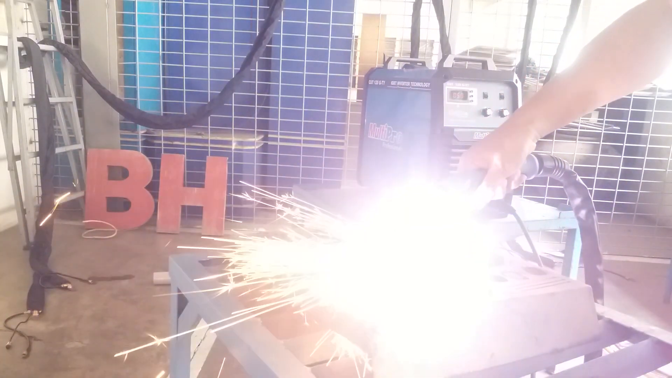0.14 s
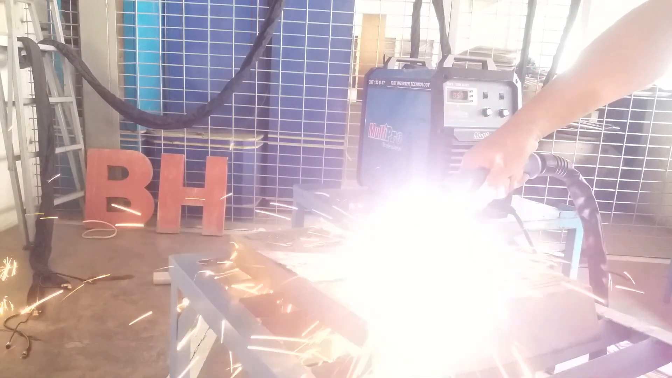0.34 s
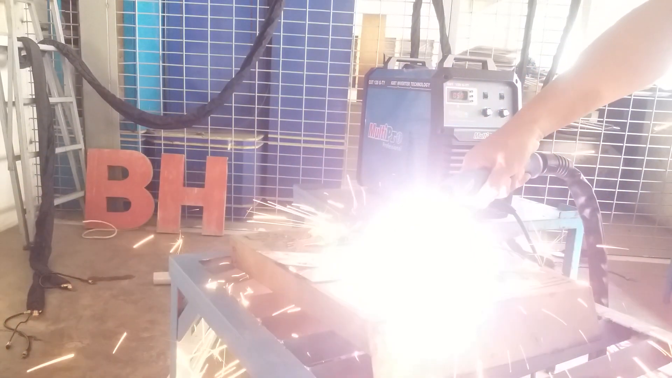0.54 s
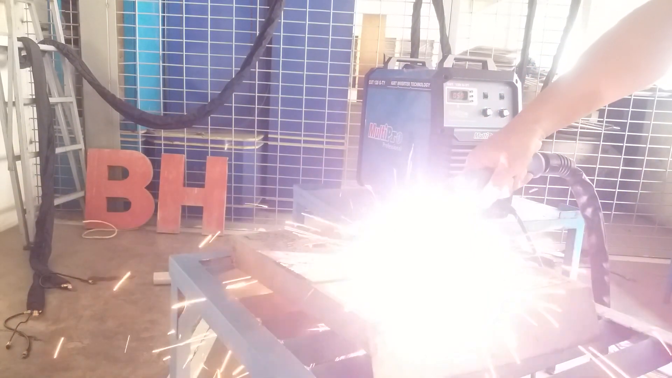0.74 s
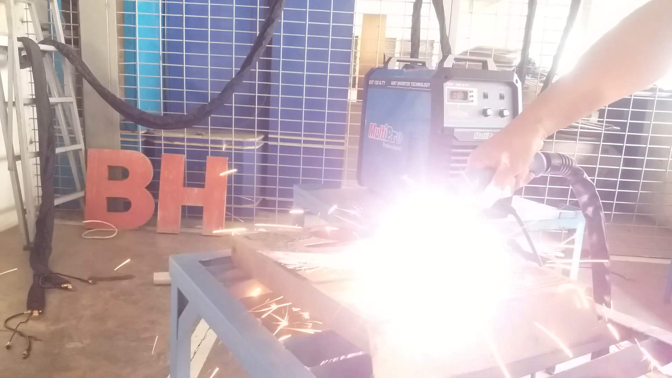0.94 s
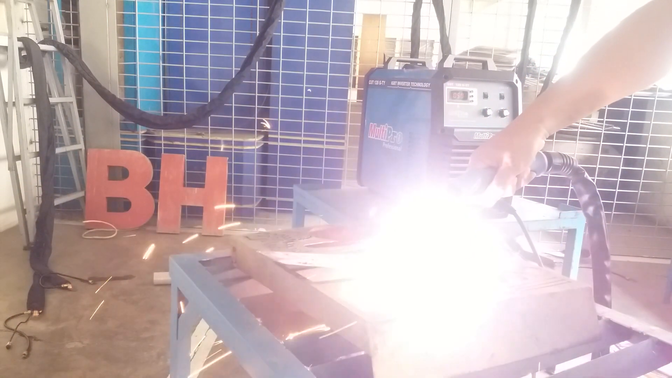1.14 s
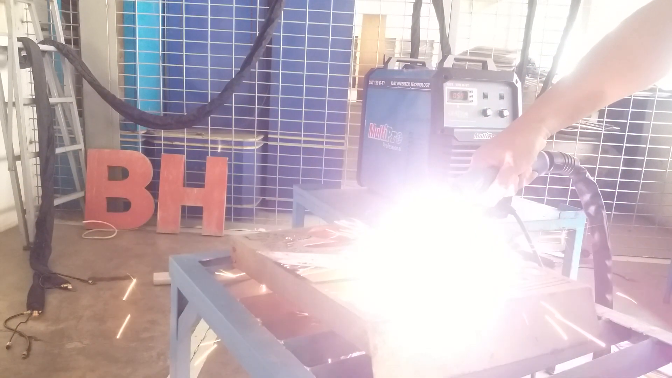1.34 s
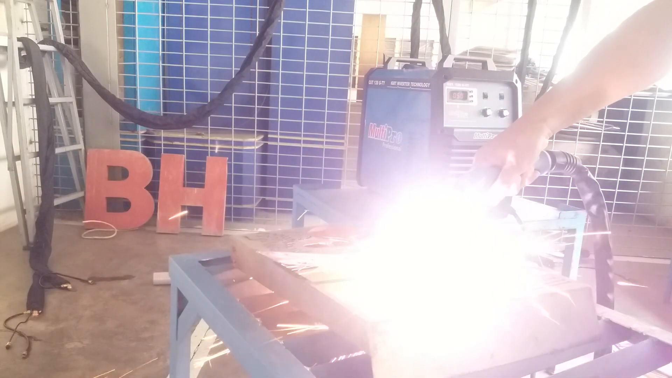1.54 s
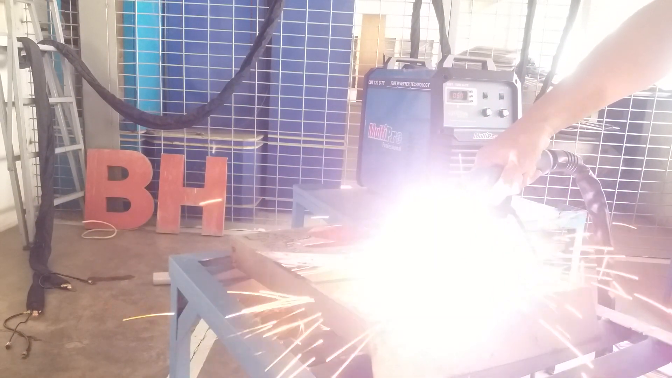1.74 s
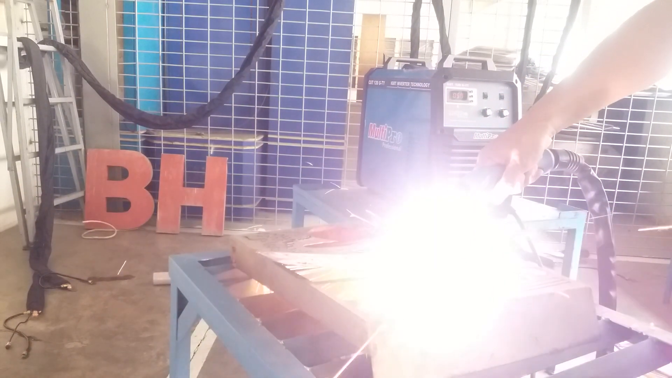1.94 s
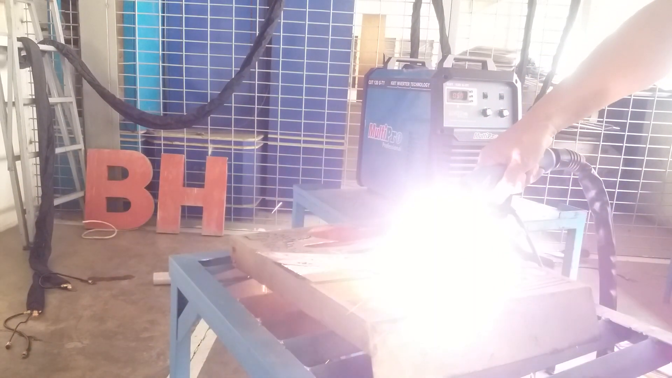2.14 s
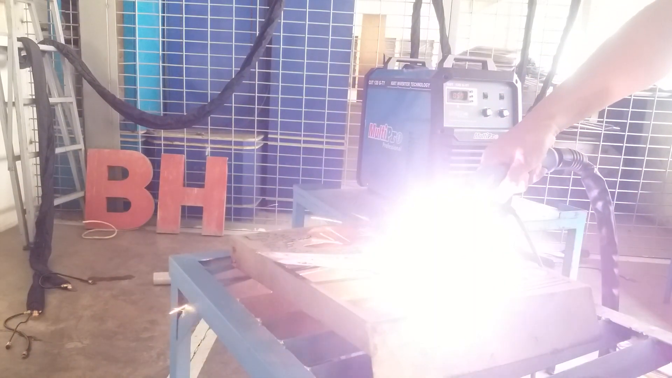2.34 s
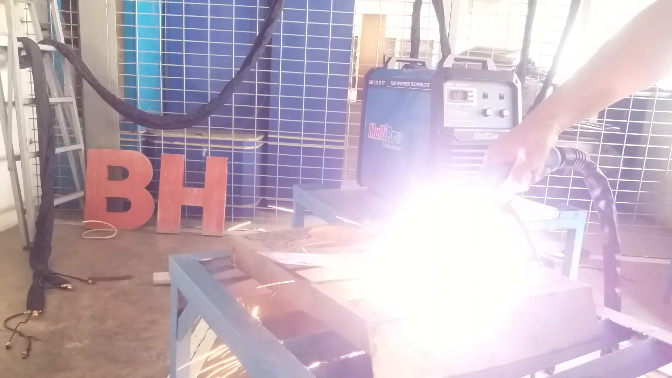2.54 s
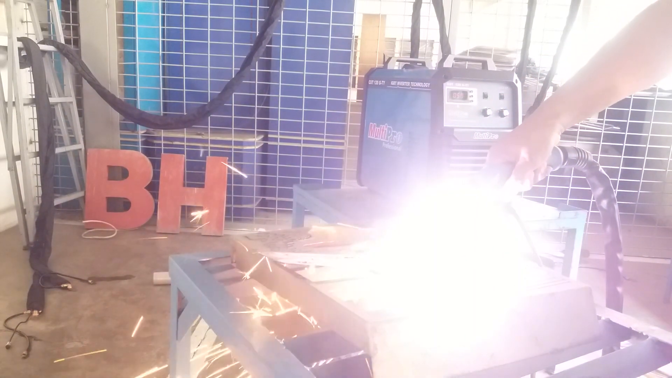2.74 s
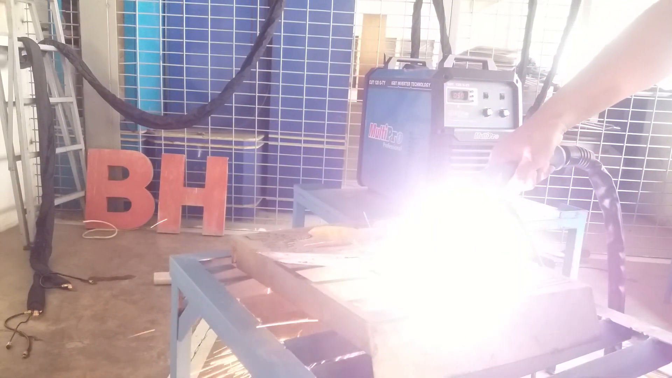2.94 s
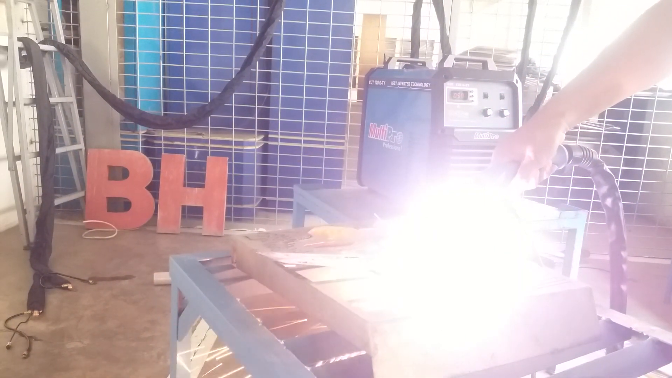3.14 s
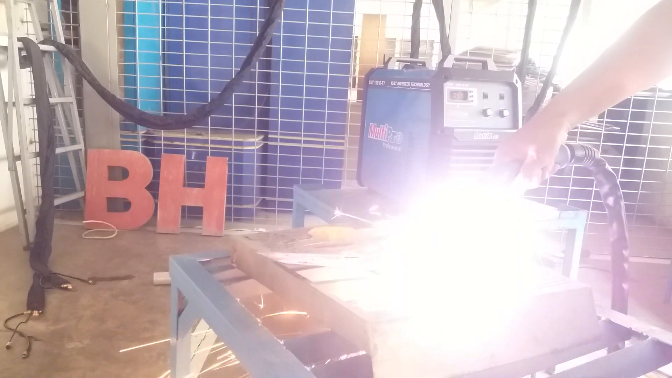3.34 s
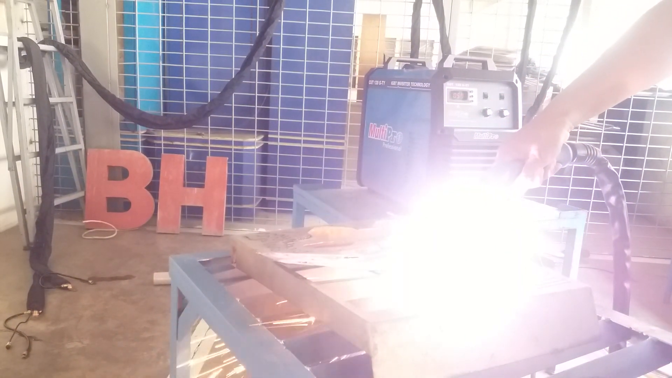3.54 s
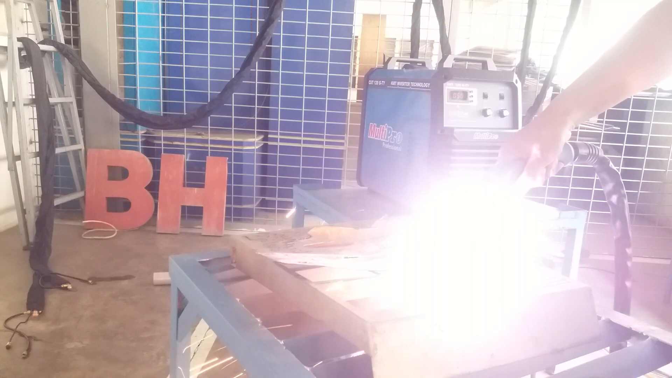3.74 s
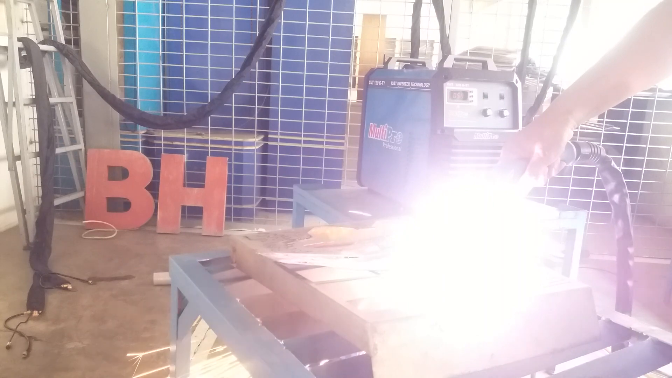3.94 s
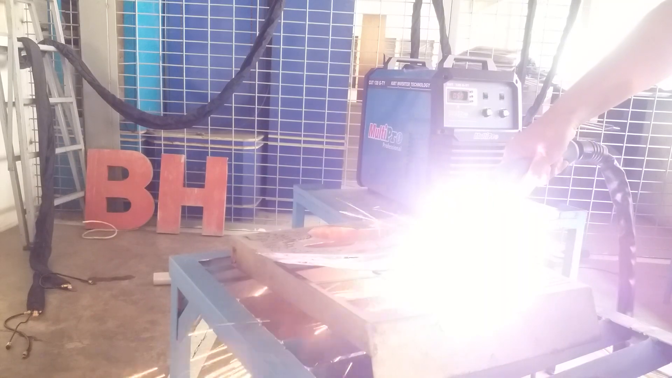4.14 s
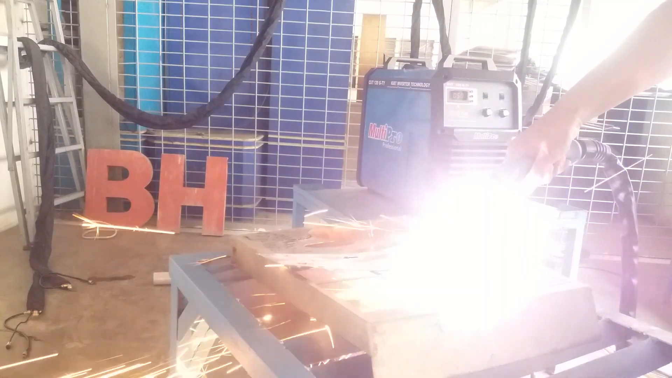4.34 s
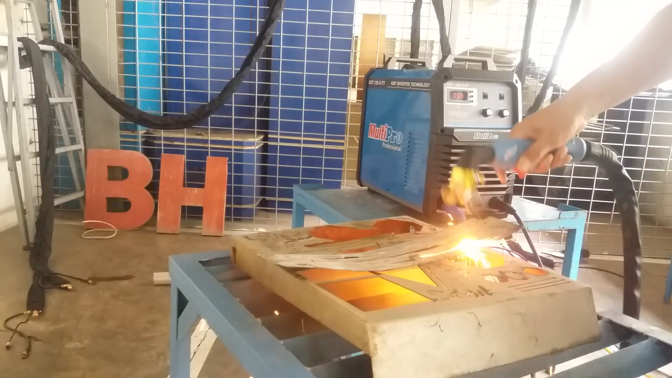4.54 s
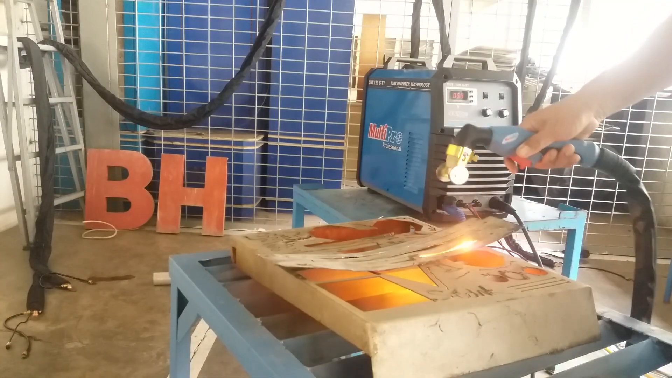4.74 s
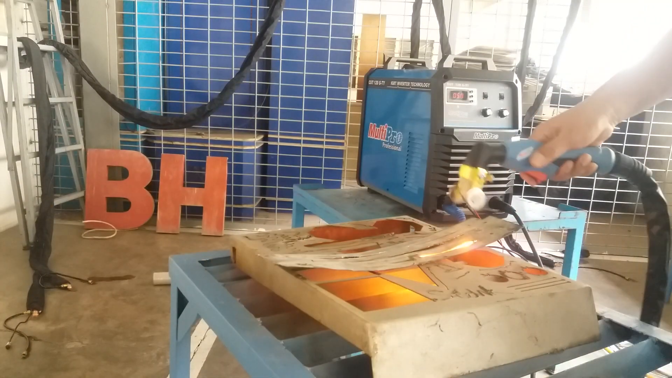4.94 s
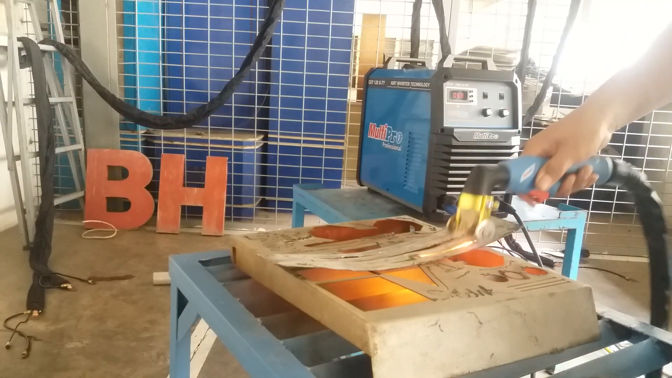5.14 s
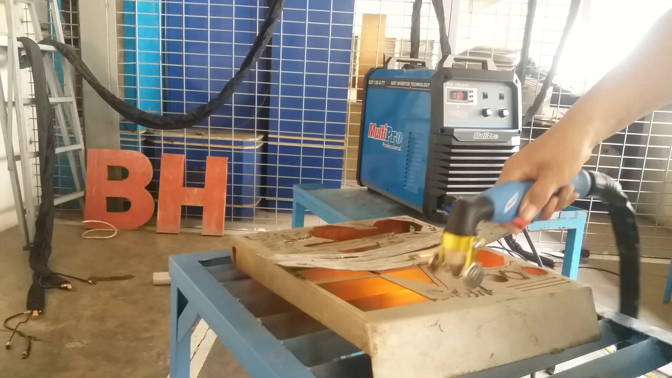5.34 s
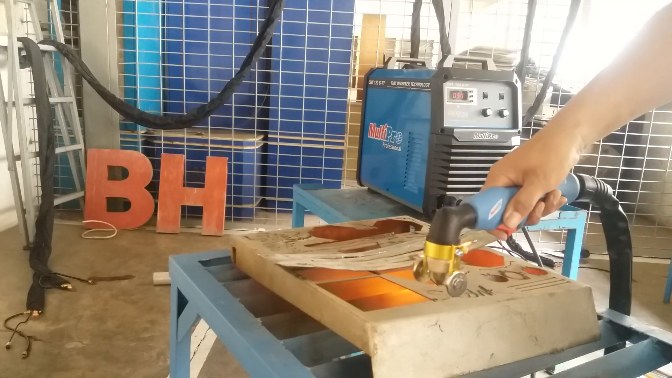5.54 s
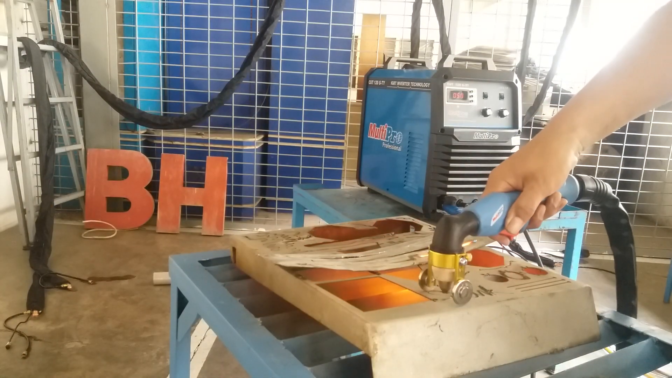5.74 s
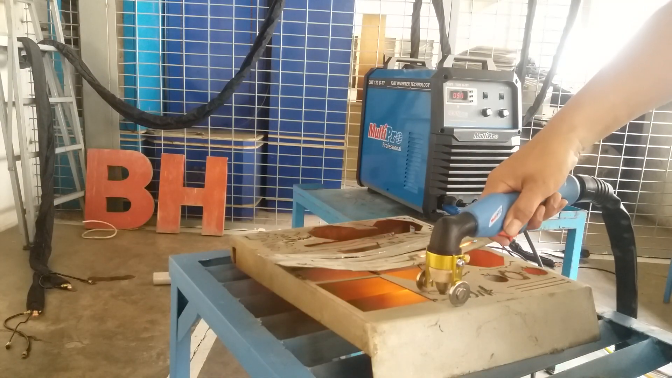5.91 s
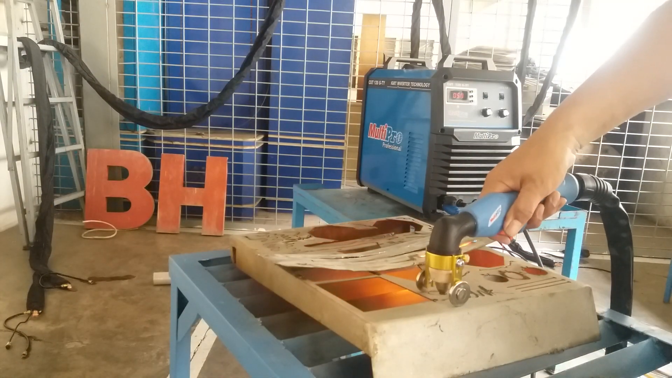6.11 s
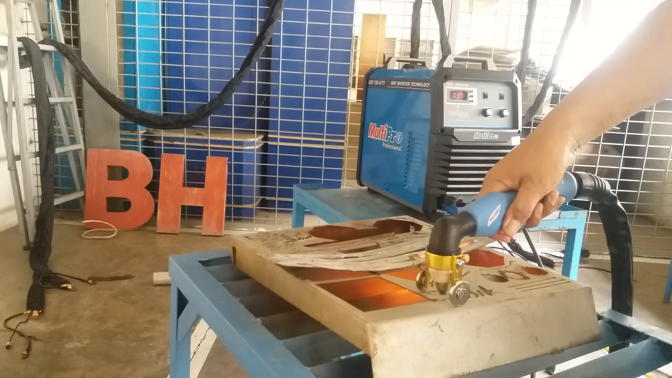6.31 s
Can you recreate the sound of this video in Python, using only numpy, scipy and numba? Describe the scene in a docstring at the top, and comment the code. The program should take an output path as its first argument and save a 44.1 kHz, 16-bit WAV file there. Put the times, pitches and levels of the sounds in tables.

```python
"""A plasma torch cuts thin steel sheet a metre from a two-port microphone in a workshop: the arc jet roars and hisses,
and its spent air buffets each port on its own. The arc breaks off, cooling air flows on and
swells into a hollow rush as the nozzle is lowered over the sheet and tray."""
import sys
import numpy as np
from scipy import signal
from scipy.fft import rfft, irfft, next_fast_len
from scipy.io import wavfile
from scipy.ndimage import uniform_filter1d, map_coordinates
from numba import njit

SR = 44100
rng = np.random.default_rng(int(sys.argv[2]) if len(sys.argv) > 2 else 0)


def unload_audio(sound):
    """Save the sound as a 16-bit wav file, at the path given as the first command line argument."""
    columns = np.transpose(np.atleast_2d(sound))
    # keep every value between -1 and 1, then stretch to whole-number steps
    steps = np.round(np.clip(columns, -1, 1) * 32767)
    wavfile.write(sys.argv[1], SR, steps.astype(np.int16))


N = 280900

# arc jet while it cuts: (s, roar dB, hiss dB, level of the dip near 8 kHz dB, hiss left minus right dB as the torch turns)
ARC = [(0.0, -19.5, -16.5, -1.5, 1), (0.29, -22.5, -16, -3, 1.5), (0.5, -24.5, -15.5, 0, 0.5), (0.65, -21.5, -16.5, 0, 0), (0.95, -23, -14.5, -3, -0.5),
       (1.24, -23, -16, -1, 0.5), (1.5, -21.5, -15.5, -2, 0), (1.75, -21, -14, -2.5, 1), (2.1, -21.5, -14.5, -1.5, 1), (2.45, -22, -16, 1, -1),
       (2.85, -21.5, -14, -3.5, 1), (3.1, -21.5, -15.5, -3, 1.5), (3.45, -22, -16.5, -0.5, 0.5), (3.78, -21.5, -15, 0, -1), (3.99, -21, -13, -3, -1),
       (4.25, -20, -13, -4, -0.5), (4.45, -22, -13.5, -1.5, 0.5)]
ROAR = [(35, -48), (60, -19), (102, -25), (342, -17.5), (760, -9), (859, -8.5), (2390, -3.5), (4240, -4), (6790, -12.5),
        (8000, -15), (10400, -37), (17600, -120)]  # (Hz, dB per Hz)
HISS = [(3500, -26), (6000, -10), (7700, -11), (10000, -4), (12000, -0.5), (14000, 0), (15600, 1)]  # (Hz, dB per Hz)
# cooling air from the nozzle: (s, hiss dB, body of the flow dB)
AIR = [(4.5, -29, -29), (4.7, -28.5, -39), (4.9, -29, -38), (5.2, -28, -36), (5.5, -27.5, -36.5), (5.6, -26, -38), (5.7, -22.5, -32),
       (5.85, -22.5, -33), (6.05, -25, -32), (6.2, -24, -35.5), (6.37, -24.5, -33.5)]
AIR_BODY = [(40, -10), (100, -13), (170, -7), (250, -11), (500, -3), (1500, -4), (3200, -3.5), (5500, -5), (7500, -8), (10000, -13)]  # (Hz, dB per Hz)
# air striking the sheet: (s, centre Hz, level dB, width octaves, hiss off the edges dB)
STRIKE = [(5.19, 960, -49, 1.5, -61), (5.215, 980, -42, 1.1, -52), (5.26, 990, -36, 2.1, -52), (5.35, 1570, -36, 1.7, -42), (5.41, 1700, -36, 2, -46),
          (5.466, 1790, -36, 2, -41), (5.52, 1900, -32, 1.5, -36), (5.575, 2010, -28.5, 1.3, -38), (5.63, 1980, -29, 1.7, -32), (5.7, 1990, -29.5, 1.8, -29.5), (5.77, 1890, -30.5, 1.9, -31.5),
          (5.85, 1760, -31, 2.2, -32), (5.974, 2080, -30, 2, -39), (6.07, 1800, -32.5, 2.4, -49), (6.158, 1690, -40.5, 1.9, -42), (6.25, 1360, -45, 1.4, -53)]
TRAY = [(117, 18, -1), (181, 32, -7), (453, 260, -8), (570, 550, -5)]  # (Hz, width Hz, dB)
# strongest puffs: (s, snap dB, port 0 left 1 right, pitch Hz, thump dB)
PUFFS = [(0.012, -23, 0, 1240, -50), (0.194, -20, 0, 750, -34), (0.212, -11.5, 0, 800, -26),
         (0.595, -15, 0, 680, -25), (0.626, -24, 0, 1150, -55), (0.783, -14, 1, 700, -31), (0.963, -14, 1, 510, -32),
         (0.985, -11, 1, 676, -26), (1.049, -13.5, 1, 730, -27), (1.069, -10.5, 1, 720, -22),
         (1.133, -10, 1, 900, -35), (1.136, -6, 1, 990, -31), (1.142, -13, 1, 470, -39), (1.171, -21, 1, 815, -37),
         (1.183, -8.5, 1, 690, -32), (1.193, -11, 1, 640, -39), (1.209, -15, 1, 810, -32),
         (1.233, -10.0, 1, 597, -37), (1.261, -7.5, 1, 696, -34), (1.274, -9.5, 1, 700, -25),
         (1.279, -16, 1, 920, -35), (1.301, -25, 0, 830, -36), (1.314, -14.5, 1, 516, -26),
         (1.42, -11, 1, 680, -26), (1.441, -7.5, 1, 760, -33), (1.455, -13, 1, 780, -20),
         (1.534, -14, 1, 750, -31), (1.54, -11, 1, 510, -31), (1.548, -18, 1, 690, -33),
         (1.561, -18, 1, 600, -35), (1.568, -18, 1, 810, -41), (1.579, -17, 1, 670, -40),
         (1.581, -11, 1, 1700, -42), (1.585, -2.5, 1, 1190, -40), (1.591, -15.5, 1, 690, -36), (1.608, -8, 1, 543, -37),
         (1.616, -11, 1, 760, -34), (1.6205, -12, 1, 590, -33), (1.634, -11, 1, 780, -31),
         (1.642, -11, 1, 590, -31), (1.664, -20, 1, 690, -27), (1.677, -9, 1, 940, -39),
         (1.754, -10, 1, 670, -26), (1.783, -14.5, 1, 670, -24), (1.811, -12, 1, 710, -24),
         (1.914, -14, 1, 810, -37), (1.92, -13, 1, 734, -33), (2.108, -14, 1, 640, -30),
         (2.139, -11.5, 1, 675, -23), (2.27, -8.5, 1, 860, -25), (2.308, -8.5, 0, 640, -33),
         (2.414, -13, 1, 920, -35), (2.468, -17, 1, 730, -28), (2.559, -17, 1, 680, -26),
         (2.568, -12, 1, 690, -23), (2.578, -11, 1, 940, -37), (2.596, -22, 0, 990, -47),
         (2.595, -16, 1, 670, -30), (2.607, -14, 1, 740, -23), (2.62, -14, 1, 680, -41),
         (2.626, -13, 1, 670, -33), (2.724, -12, 1, 690, -24), (2.758, -20, 1, 590, -28),
         (2.777, -16, 0, 590, -28), (2.78, -14, 1, 674, -31), (2.784, -11, 1, 620, -30),
         (2.789, -17, 0, 690, -29), (2.806, -15, 0, 620, -31), (2.826, -18, 0, 730, -39),
         (2.836, -14.0, 0, 790, -33), (2.846, -19, 0, 760, -27), (2.848, -13.5, 1, 720, -24),
         (2.886, -10, 0, 830, -27), (2.893, -22, 0, 810, -32), (2.914, -12, 1, 790, -25),
         (2.922, -8, 1, 725, -27), (2.926, -23, 0, 830, -33), (2.93, -13, 0, 600, -24),
         (3.043, -11, 1, 740, -22), (3.125, -12, 1, 730, -25), (3.165, -10, 1, 710, -20),
         (3.176, -12, 1, 760, -25), (3.187, -16, 1, 590, -26), (3.195, -13, 1, 610, -31),
         (3.258, -10, 1, 860, -32), (3.306, -11, 1, 660, -34), (3.332, -14, 1, 830, -28),
         (3.399, -8.5, 1, 630, -18.5), (3.719, -11.5, 1, 690, -26), (3.755, -17, 1, 670, -27),
         (3.762, -14, 1, 770, -34), (3.792, -11.5, 1, 630, -27), (3.845, -9.5, 1, 695, -25),
         (3.869, -13, 0, 700, -36), (3.892, -12, 1, 740, -30), (3.928, -11, 1, 730, -33),
         (3.947, -14, 1, 643, -21), (3.976, -10, 1, 770, -38), (4.001, -21, 1, 840, -37),
         (4.02, -12, 1, 620, -22), (4.069, -22, 0, 1060, -50), (4.072, -8, 1, 606, -26),
         (4.077, -10, 1, 690, -27), (4.1, -13, 1, 730, -20), (4.113, -13, 1, 540, -38),
         (4.117, -19, 1, 600, -38), (4.129, -14, 1, 640, -24), (4.14, -18, 0, 830, -47),
         (4.21, -12, 1, 875, -32), (4.359, -13, 1, 745, -29), (4.399, -17, 1, 800, -36), (4.428, -18, 1, 610, -29),
         (4.457, -5, 1, 900, -28), (4.46, -17, 0, 860, -34)]
PORTS = [(60, -9), (110, 1), (200, -1), (380, -2.5), (700, -2), (1290, -1.5), (2380, 2), (3300, -0.5), (4400, -4.5), (5500, -7.5),
         (6500, -1), (7800, 6), (9000, 4), (11000, 2), (15000, 1.5)]  # (Hz, left minus right dB)
TOP_HZ = 15735  # fixed
AIR_HISS = [(5000, -37), (7500, -16), (8500, -11), (10000, -4.5), (11000, -2.5), (12500, 0.5), (14000, 0.5), (15800, 2)]  # (Hz, dB per Hz)
EDGE_HZ, EDGE_WIDTH_HZ = 4250, 4900
ARC_ALIKE = [(100, 0.94), (1000, 0.44), (2500, 0.57), (5000, 0.27), (7000, 0.1), (10000, 0.11), (16000, 0.11)]  # (Hz, share common to the ports)
AIR_ALIKE = [(100, 1), (400, 0.89), (2000, 0.82), (4500, 0.4), (6800, 0.088), (9000, 0.43), (16000, 0.14)]  # (Hz, share common to the ports)
LAG_S = 7e-5  # the left port hears the torch later
# the arc breaks: the workshop rings out, the roar in the kerf lingers a moment
ARC_OFF_S, ROAR_LINGERS_S = 4.455, 0.015
ROAR_T60_S = 0.5
HISS_T60_S = 0.29

# the tray drones more and more as the nozzle settles over it
DRONE_FROM_S, DRONE_RISE_S, DRONE_DB = 5.73, 0.16, -39
# each puff ends a gust of smaller eddies on its port, and a lull follows; (left, right), the right port lies in the stream
GUST_DB, GUST_S, CALM_DB = (-23, -21.5), (0.054, 0.063), (-55, -37)
STREAM_FROM_S, STREAM_RISE_S = 0.43, 0.39  # the stream settles on the ports once the cut is under way
# bench, tray and hand mirror the torch; the paths change as it moves
ECHO_DB, ECHO_FIRST_S, ECHO_LAST_S, ECHO_DRIFT_S, ECHO_DRIFT_RATE = -20, 0.0007, 0.006, 9e-5, 2.2  # fixed
ECHO_ABOVE_HZ = 2500  # small surfaces mirror only short waves  # fixed
DIP_HZ, DIP_WIDTH_HZ = 7940, 8000
LULL_S, THUMP_HZ = 0.029, 225
SHEET = [(872, 26, -1), (1520, 110, 1.5), (1863, 44, 0.5), (2110, 230, -0.5), (2260, 110, 0.5), (2760, 140, 1), (3100, 79, 2),
         (3420, 51, 1), (4180, 63, 1.5), (4660, 120, -1)]  # the sheet rings with the jet: (Hz, width Hz, lift dB)
OVERTONE, OVERTONE_DB, OVERTONE_OCTAVES = 1.86, -12, 0.14  # second resonance of the gap, as a multiple of the first
WALLS_DB, WALLS_T60_S, WALLS_FROM_S, WALLS_BELOW_HZ = -7, 0.25, 0.008, 4000  # sound returned by the workshop, dull  # fixed
# the jet's colour wanders as the torch travels: (s, then level dB near each of the four centres below)
WANDER = [(0, 0.4, 0.23, 0.078, 0), (0.3, 1, 0, 0, 0), (0.6, 1, 0.32, 0.095, 0.08), (0.9, 0.24, 0.25, 0, 1), (1.2, 0, 0.17, 1, 0), (1.5, 0, 0, 1, 0), (1.8, 0, 0.19, 1, 0),
          (2.1, 0, 1, 0, 0), (2.4, 0.12, 0.74, 0, 0), (2.7, 0, 0.91, 0.45, 0), (3.0, 0, 0.89, 0, 0), (3.3, 0, 1, 0.089, 0), (3.6, 0, 0, 0, 0), (3.9, 0, 0, 0.23, 0), (4.2, 0, 0, 0.093, 0), (4.45, 0, 0, 0, 0)]
WANDER_HZ = [(2000, 770), (3100, 570), (5500, 1400), (15000, 2200)]  # (centre Hz, width Hz)
CORE_DB, CORE_OCTAVES = -7, 0.55  # a narrower core at the centre of the gap's peak, sharpening it



def undb(db):
    return 10 ** (np.asarray(db) / 20)


def unit(x):
    return x / np.sqrt(np.mean(x ** 2))


def along(table):
    """Columns of a time table at every sample; outside it the end values hold."""
    s, *columns = np.transpose(table)
    return [np.interp(np.arange(N) / SR, s, c) for c in columns]


def within(table, fade_s=0.14):
    """1 while a table runs, fading to 0 outside it."""
    t0, t1 = table[0][0], table[-1][0]
    return np.interp(np.arange(N) / SR, [t0 - fade_s, t0, t1, t1 + fade_s], [0, 1, 1, 0])


def across(table, hz):
    """A frequency table read on a log axis."""
    f, v = np.transpose(table)
    return np.interp(np.log(hz + 1), np.log(f), v)


def walk(rate):
    """Random levels held 1 / rate s and slewed twice; spread near 1."""
    k = int(SR / rate)
    return unit(uniform_filter1d(uniform_filter1d(np.repeat(rng.standard_normal(N // k + 1), k), k), k)[:N])


M = next_fast_len(N)
HZ = np.arange(M // 2 + 1) * SR / M


def colour(x, gain):
    return irfft(rfft(x, M) * gain, M)[..., :N]


def field(alike):
    """Spectra of white noise at the two ports: a common part that arrives with a lag, the rest diffuse."""
    c = np.clip(across(alike, HZ), 0, 1)
    right, own = rfft(rng.standard_normal((2, M)))
    return np.array([c * right * np.exp(-2j * np.pi * HZ * LAG_S) + np.sqrt(1 - c ** 2) * own, right])


def rush(spectrum, alike, shared_db, own_db, rate, drift_db=0., count=1):
    """Turbulent noise in count bands an octave: they surge together, flicker alone and drift slowly apart."""
    gain, surge, out = undb(across(spectrum, HZ)), walk(rate), 0
    bins, low = field(alike) * gain, np.log2(spectrum[0][0] / 62.5)  # fixed
    for hz in 62.5 * 2. ** (np.arange(max(int(low * count), 0), 8 * count + 1) / count):  # fixed
        share = np.cos(np.pi / 2 * np.clip(count * np.log2((HZ + 1) / hz), -1, 1)) ** 2
        out = out + irfft(bins * share, M)[:, :N] * undb(shared_db * surge + own_db * walk(rate) + drift_db * walk(4))  # fixed
    return unit(out)


@njit
def sweep(x, hz, damping):
    """State-variable band-pass with a moving centre."""
    y, b, l = np.empty(len(x)), 0., 0.
    for i in range(len(x)):
        g, k = np.tan(np.pi * hz[i] / SR), damping[i]
        v = (b + g * (x[i] - l)) / (1 + g * (g + k))
        b, l, y[i] = 2 * v - b, l + 2 * g * v, np.sqrt(k) * v
    return y


def arc():
    """The constricted jet roars in the kerf and hisses at the nozzle."""
    roar_db, hiss_db, dip_db, turn_db = along(ARC)
    after = np.arange(N) / SR - ARC_OFF_S
    roar_db = roar_db - 60 * np.maximum(after - ROAR_LINGERS_S, 0) / ROAR_T60_S  # fixed
    hiss_db = hiss_db - 60 * np.maximum(after, 0) / HISS_T60_S  # fixed
    roar = rush(ROAR, ARC_ALIKE, shared_db=.45, own_db=.35, rate=20, drift_db=.4, count=2)  # fixed
    hiss = rush(HISS, ARC_ALIKE, shared_db=.5, own_db=.8, rate=13, drift_db=.9, count=6)  # fixed
    jet = undb(roar_db) * roar + undb(hiss_db + np.array([turn_db, -turn_db]) / 2) * hiss
    for (hz, width), db in zip(WANDER_HZ, along(WANDER)):
        jet = jet + (undb(db) - 1) * colour(jet, resonance(hz, width))
    return jet + (undb(dip_db) - 1) * colour(jet, resonance(DIP_HZ, DIP_WIDTH_HZ))


def air():
    """Cooling air flowing free of the nozzle."""
    hiss_db, body_db = along(AIR)
    hiss = rush(AIR_HISS, AIR_ALIKE, shared_db=.3, own_db=.3, rate=20)  # fixed
    body = rush(AIR_BODY, AIR_ALIKE, shared_db=.3, own_db=.5, rate=18)  # fixed
    return within(AIR) * (undb(hiss_db) * hiss + undb(body_db) * body)


def buffeting(count=3000, spread_db=3.5, eddy_hz=800.0, octaves=1.0, slope_db=1.5):
    """Eddies burst on each port alone: many at random, as strong as the gust there, and the listed puffs."""
    out = np.zeros((2, N))
    for port in range(2):
        chance = np.c_[rng.random((count, 2)), rng.exponential(size=count), rng.standard_normal(count)]
        clump_db = 3.16 * walk(40)  # eddies come in packets
        times = chance[:, 0] * ARC_OFF_S  # faster gusts shed higher eddies; slow ones push more gently
        for s, strength, (_, phase, size, pitch) in zip(times, gust(times, port) + 1e-4, chance):
            db = spread_db * min(size, 3.0) + slope_db * pitch + clump_db[int(s * SR)] - 7.0
            add(out, port, s, strength * undb(db) * puff(eddy_hz * (max(strength, 0.012) / 0.032) ** 0.26 * 2 ** (octaves * pitch), turns=1.18, phase=phase))
    shreds = rng.standard_normal((len(PUFFS), 3, 3))
    for (s, db, port, hz, thump_db), phase, shred in zip(PUFFS, rng.random(len(PUFFS)), shreds):
        # a puff tears into smaller, sharper eddies just before it
        for late, pitch, turn in shred:
            add(out, round(port), s - .002 + 0.0044 * late, undb(db - 10.0) * puff(2.32 * hz * 2 ** (.5 * pitch), turns=1.56, phase=turn))
        add(out, round(port), s - 3 / hz, undb(db) * snap(hz, cycles=0.46, phase=phase, edge=0.68))
        # the bulk of the puff pushes the diaphragm: a duller thump behind the snap
        add(out, round(port), s, undb(thump_db) * puff(THUMP_HZ, turns=1.03, phase=phase))
    return out


def resonance(hz, width):
    return 1 / (1 + (2 * (HZ - hz) / width) ** 2)


def strike():
    """Air hitting the sheet: peaks that climb as the gap closes, hiss off the edges, and the tray's drone."""
    hz, level_db, octaves, edge_db = along(STRIKE)
    t = np.arange(N) / SR
    gap = hollow(hz, octaves) + undb(CORE_DB) * hollow(hz, CORE_OCTAVES) + undb(OVERTONE_DB) * hollow(OVERTONE * hz, OVERTONE_OCTAVES)
    edge = unit(irfft(field(AIR_ALIKE) * resonance(EDGE_HZ, EDGE_WIDTH_HZ) ** 2, M)[:, :N])
    drone = unit(irfft(field(AIR_ALIKE) * sum(undb(db) * resonance(f, w) for f, w, db in TRAY), M)[:, :N])
    sheet = undb(0.5 * walk(30)) * (undb(level_db) * gap + undb(edge_db) * edge)
    return within(STRIKE, fade_s=0.073) * sheet + undb(DRONE_DB) * (1 - np.exp(-np.maximum(t - DRONE_FROM_S, 0) / DRONE_RISE_S)) * drone


def puff(hz, turns, phase, rise=0.077, fall=1.47):
    """An eddy sweeping past a port: a short swing whose pitch falls as it slows; rms 1 near its top."""
    u = np.arange(SR // 30) / SR * hz  # time in periods
    shape = (1 - np.exp(-u / rise)) * (1 + u) ** -fall * np.cos(np.pi / 2 * u / u[-1])
    return 2.17 * shape * np.sin(2 * np.pi * (turns * np.log(1 + u) + phase))


def add(out, port, s, grain):
    i = int(s * SR)
    out[port, i:i + len(grain)] += grain




def gust(s, port):
    """Strength of the spent air on a port: a steady stream that swells up to every puff there."""
    at, db, where = np.transpose(PUFFS)[:3]
    after = s[:, None] - at
    near = np.exp(-(after / np.where(after > 0, LULL_S, GUST_S[port])) ** 2) * (np.round(where) == port)
    stream = undb(CALM_DB[port]) * np.clip((s - STREAM_FROM_S) / STREAM_RISE_S, 0, 1)
    return np.sqrt(stream ** 2 + near @ undb(db + GUST_DB[port]) ** 2)


def mirrored(x, count=10):
    """Near reflections at each port, their delays drifting, comb the hiss with shifting peaks."""
    t, out = np.arange(N) / SR, x.copy()
    short = HZ ** 2 / (HZ ** 2 + ECHO_ABOVE_HZ ** 2)
    treble = colour(x, short)
    for port in range(2):
        for k, place in enumerate(rng.random(count)):
            late = ECHO_FIRST_S + (k + place) / count * (ECHO_LAST_S - ECHO_FIRST_S) + ECHO_DRIFT_S * walk(ECHO_DRIFT_RATE)
            out[port] += undb(ECHO_DB) * map_coordinates(treble[port], [(t - late) * SR], order=3, mode="mirror")
    return colour(out, 1 / np.sqrt(1 + count * (short * undb(ECHO_DB)) ** 2))


def snap(hz, cycles, phase, edge=.45):
    """The crack at the front of a puff: about one swing with a sharp leading edge, centred 3 periods in."""
    u = np.arange(int(6 * SR / hz)) / SR * hz - 3  # fixed
    front = np.exp(-((u + .3) / .3) ** 2) * np.sin(2 * np.pi * (2.3 * u + phase))  # fixed
    return np.exp(-(u / cycles) ** 2) * np.sin(2 * np.pi * (u + phase)) + edge * front


def walls(x):
    """A decaying spray of wall reflections at each port, roughening the spectrum with fine peaks."""
    t = np.arange(SR // 4) / SR
    tail = rng.standard_normal((2, len(t))) * undb(-60 * t / WALLS_T60_S) * (t > WALLS_FROM_S)  # fixed
    tail = tail * undb(WALLS_DB) / np.sqrt(np.sum(tail ** 2, axis=1, keepdims=True))
    dull = resonance(0, 2 * WALLS_BELOW_HZ)
    wet = x + signal.fftconvolve(colour(x, dull), tail, axes=1)[:, :N]
    return colour(wet, 1 / np.sqrt(1 + (dull * undb(WALLS_DB)) ** 2))


def hollow(hz, octaves):
    """Air through a moving resonance, held at rms 1."""
    damping = np.clip(2 ** (octaves / 2) - 2 ** (-octaves / 2), .1, 3) + 0 * hz  # fixed
    gap = np.array([sweep(sweep(port, hz, damping), hz, damping) for port in irfft(field(AIR_ALIKE), M)[:, :N]])
    return gap / np.sqrt(uniform_filter1d(np.mean(gap ** 2, axis=0), size=SR // 10))


def scene():
    pan_db = across(PORTS, HZ)
    ring_db = sum(db * resonance(hz, width) for hz, width, db in SHEET)
    return walls(mirrored(colour(arc() + air() + strike(), undb(ring_db + np.array([pan_db, -pan_db]) / 2)))) + buffeting()


def record(dry):
    """The microphone loses the deepest bass and the recorder cuts the top."""
    low = signal.butter(3, 55, "highpass", fs=SR, output="sos")
    top = signal.ellip(16, .3, 70, TOP_HZ, fs=SR, output="sos")  # fixed
    return signal.sosfilt(top, signal.sosfilt(low, dry))


dry = scene()
out = record(dry)
unload_audio(out)
```